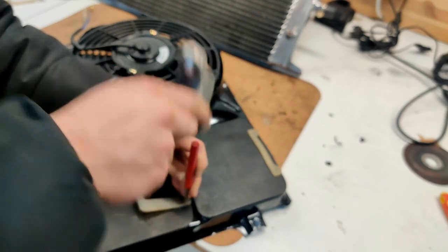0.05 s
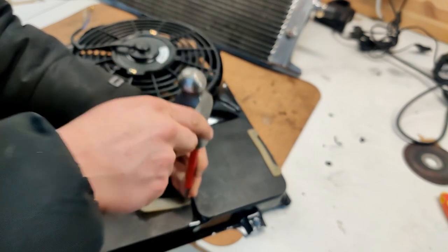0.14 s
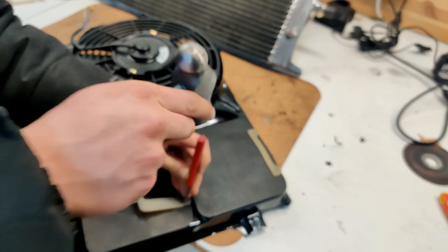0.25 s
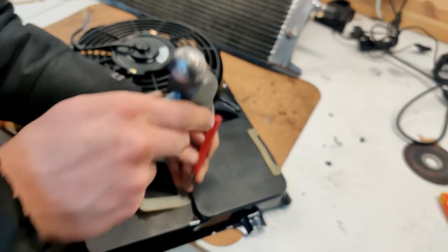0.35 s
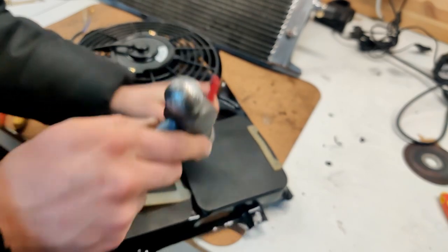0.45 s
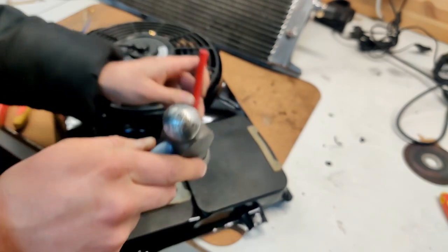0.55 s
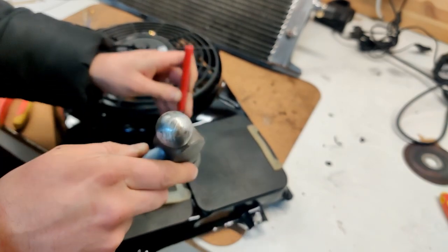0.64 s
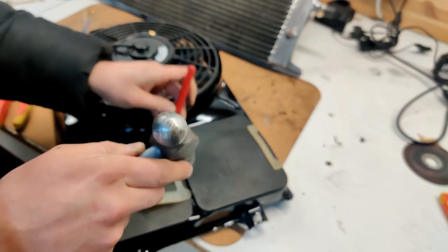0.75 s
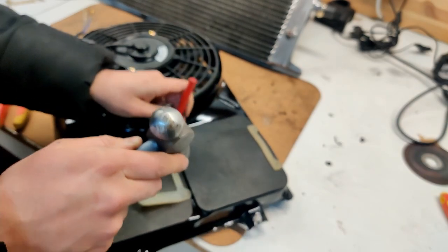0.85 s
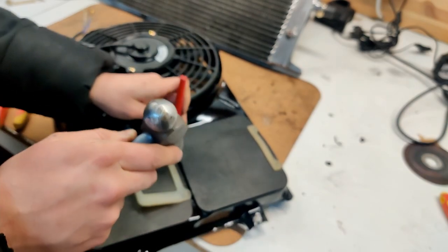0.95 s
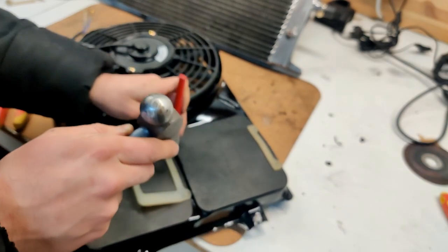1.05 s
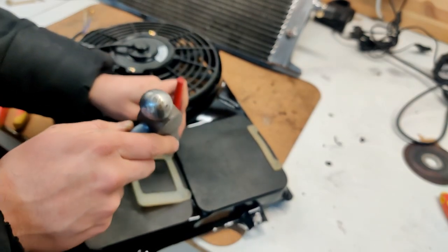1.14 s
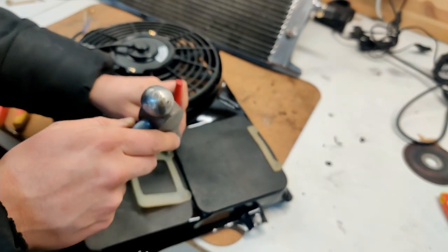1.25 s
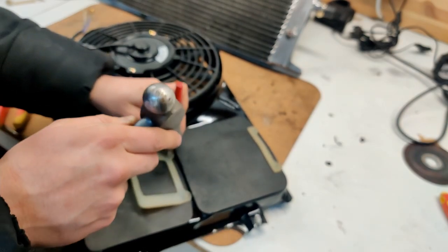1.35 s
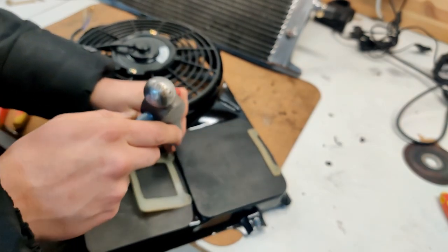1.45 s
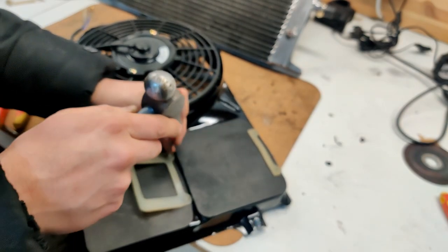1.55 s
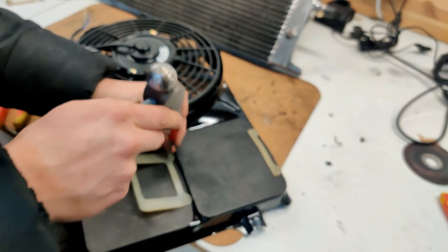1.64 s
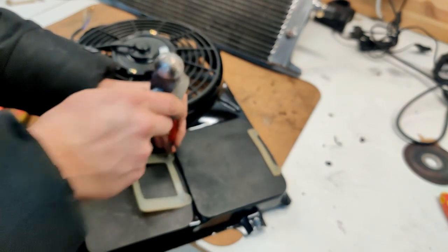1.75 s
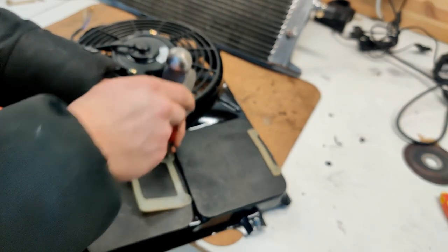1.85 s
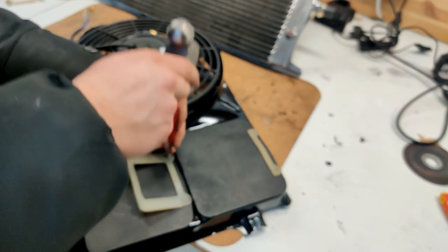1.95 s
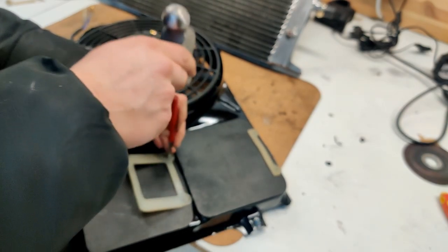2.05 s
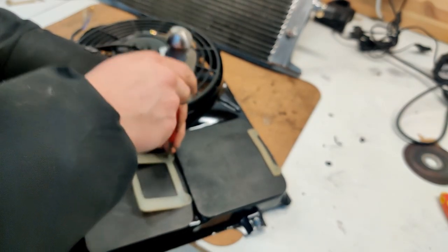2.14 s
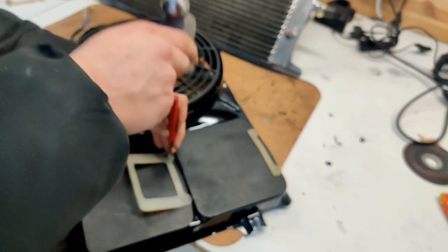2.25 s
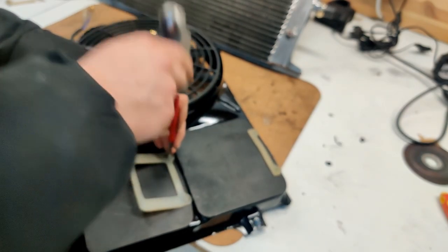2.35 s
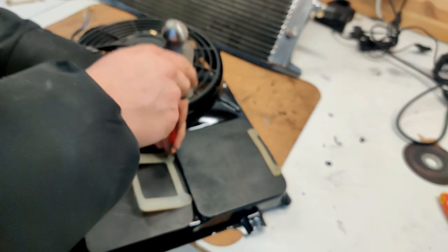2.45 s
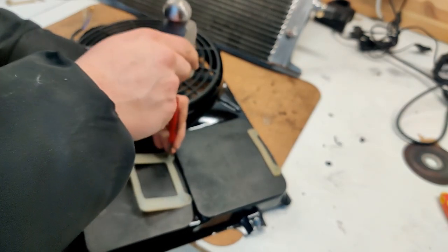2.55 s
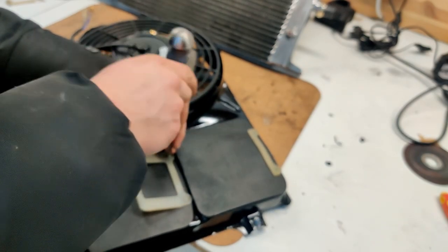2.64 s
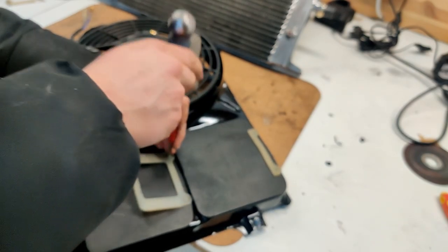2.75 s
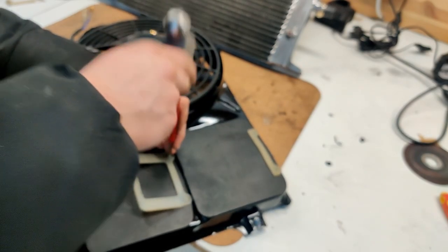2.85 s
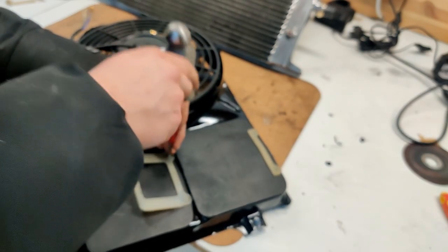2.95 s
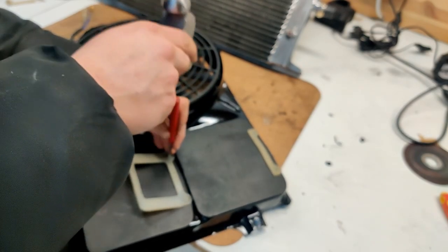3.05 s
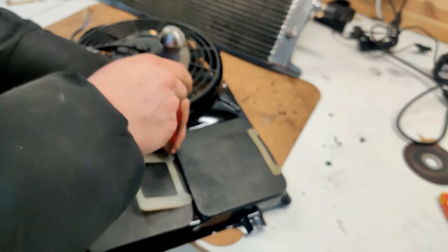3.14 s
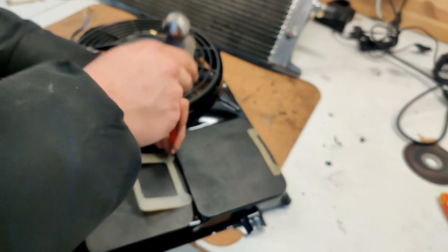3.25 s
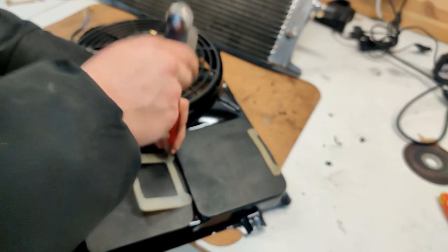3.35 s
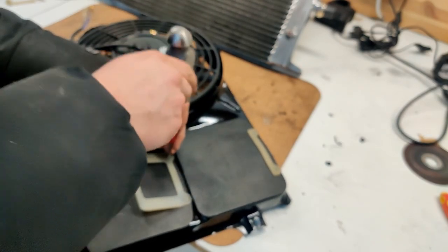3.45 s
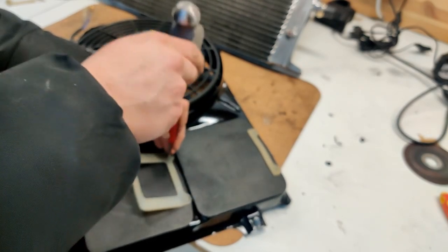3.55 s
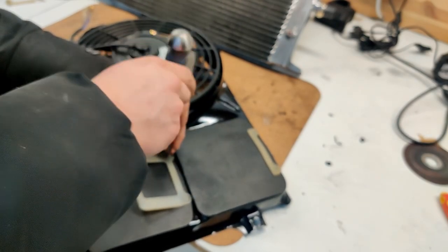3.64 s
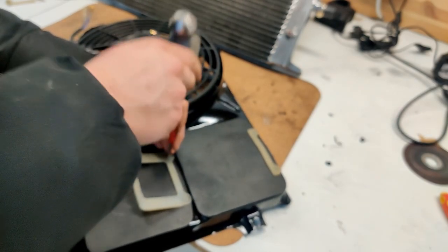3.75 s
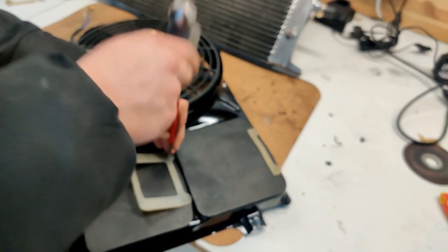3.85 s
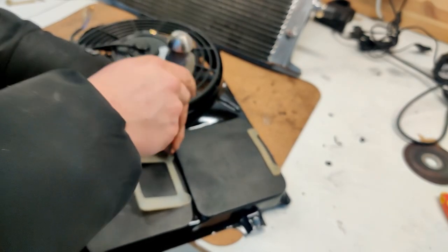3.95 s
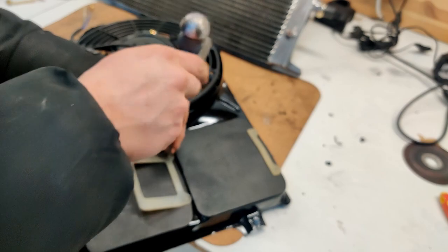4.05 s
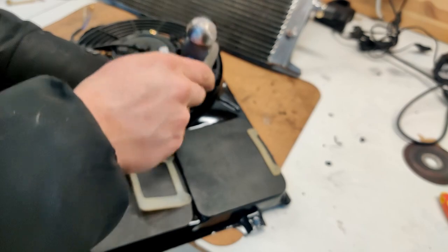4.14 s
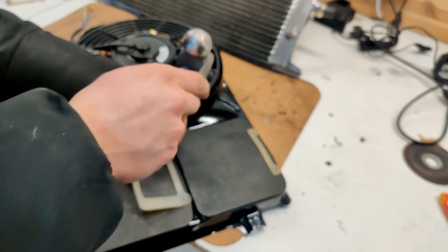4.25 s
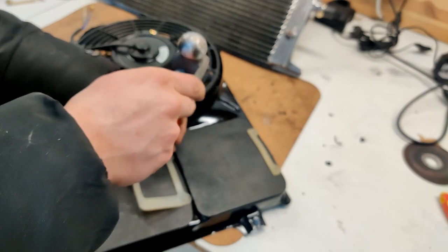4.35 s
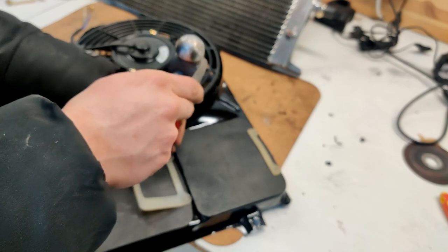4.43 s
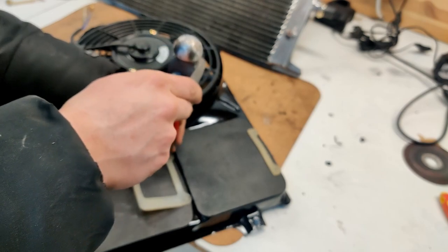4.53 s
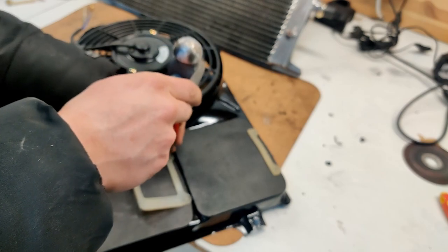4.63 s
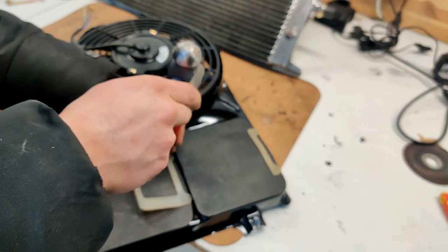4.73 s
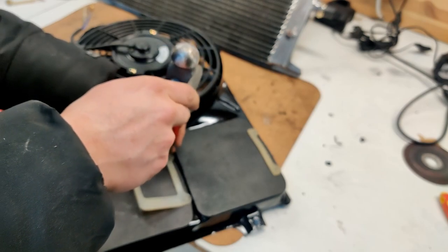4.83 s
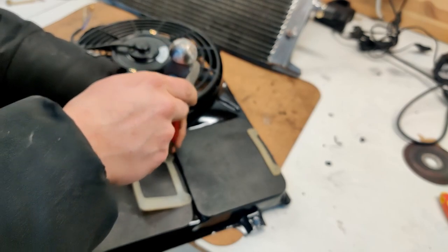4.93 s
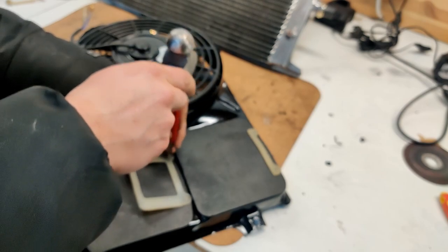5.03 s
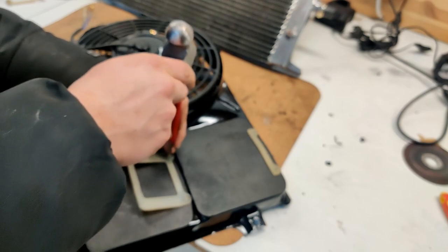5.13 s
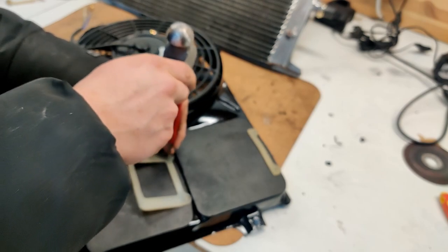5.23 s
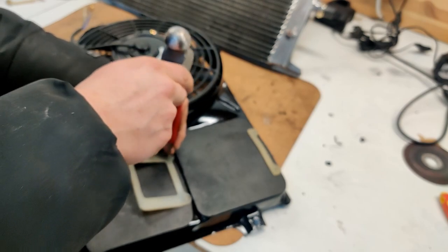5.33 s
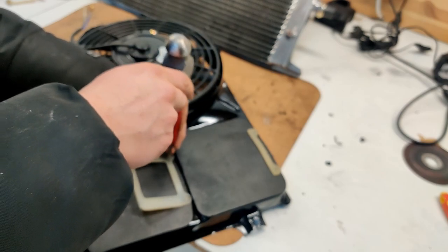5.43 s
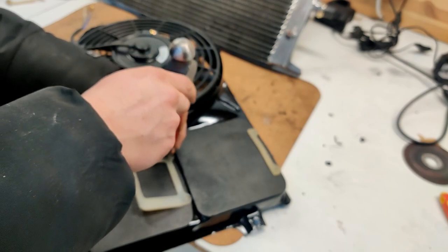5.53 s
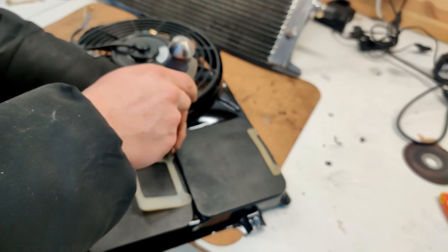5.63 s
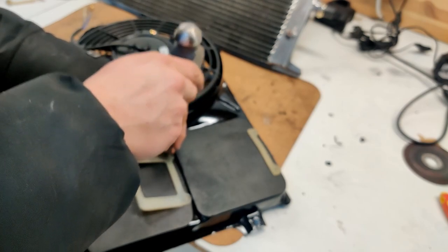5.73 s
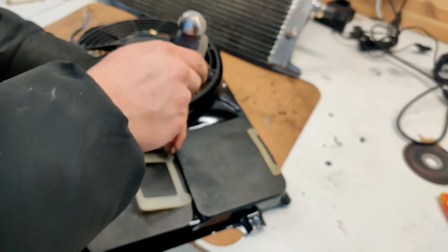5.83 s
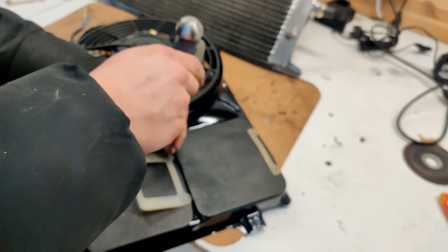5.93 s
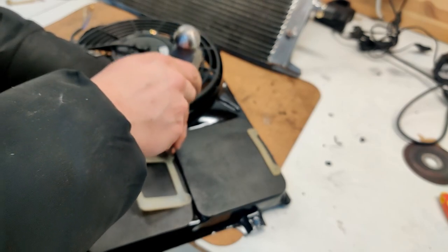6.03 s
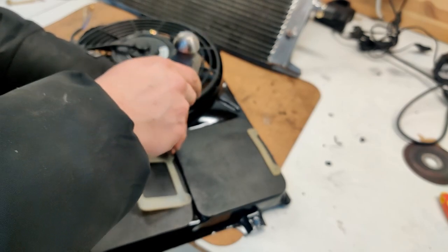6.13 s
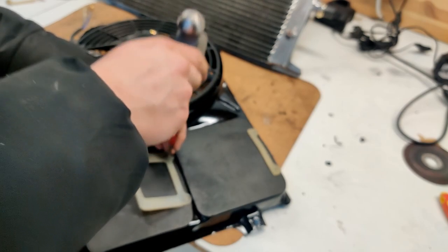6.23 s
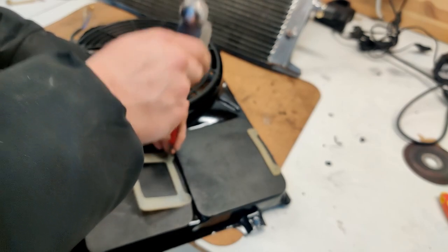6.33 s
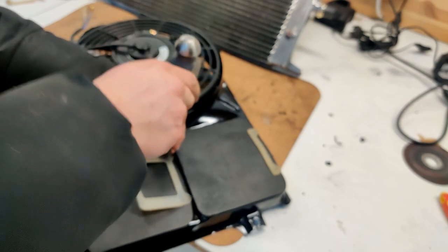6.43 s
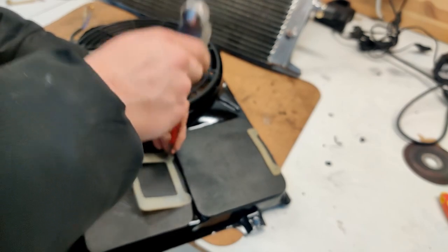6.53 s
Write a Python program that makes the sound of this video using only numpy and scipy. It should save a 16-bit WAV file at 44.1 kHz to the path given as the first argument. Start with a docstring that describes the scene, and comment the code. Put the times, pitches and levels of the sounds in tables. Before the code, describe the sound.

Close microphone at a garage workbench, with very faint air noise. The tail of a previous blow opens, and a hard, bright, short clank lands at 0.15 s. Around 0.5-0.6 s soft hollow knocks mark the part being shifted; tiny touches and faint jacket rustle continue to 1.6 s. A nearly inaudible tap at 1.93 s and a lighter one at 2.2 s lead into firm, even hammer blows from 2.47 to 3.98 s, roughly every quarter second. They have a steel crack, brief housing rattle, thin high ring and low bench boom, becoming thuddier as the pin seats. The rumble fades; a sleeve brushes at 4.2 s, with faint touches at 4.5-4.85 s and a soft double knock at 5.25 s. A dull, weak tap comes at 5.57 s, a moderate one at 6.17 s, and a loud, thudding clank at 6.48 s ends it.

```python
"""Short, damped clanks: a small hammer taps pins through rubber flaps into a metal housing on a garage workbench.
Each tap is a noise crack and chatter plus decaying modes; slow low sines boom as the bench, a noise tail is the garage.
Filtering makes the pins thud more as they go home and dulls the light taps, which the rubber cushions.
Between runs the hands shift the part (soft noise bursts and low modes) and a jacket sleeve rustles (shaped noise).
Bench rumble and faint garage air lie underneath."""
import sys
import numpy as np
from scipy import signal
from scipy.fft import rfft, irfft, next_fast_len
from scipy.io import wavfile
from scipy.ndimage import uniform_filter1d, map_coordinates

SR = 44100
rng = np.random.default_rng(int(sys.argv[2]) if len(sys.argv) > 2 else 0)


def transcribe(u):
    """Save the signal u as a 16-bit wav file named by the first command-line argument.

    u: samples, shape (n,) or (channels, n), limited to [-1, 1]; the rate is SR.
    q: integer samples, one column per channel.
    """
    v = np.clip(np.atleast_2d(u).T, -1, 1)
    q = np.round(v * 32767).astype(np.int16)
    wavfile.write(sys.argv[1], SR, q)


N = 290178

# Hammer taps; mode levels are relative: start_s, level_db, seated_0_to_1,
# low_mode_hz, low_mode_db, high_mode_hz, high_mode_db, pin_ring_hz
TAPS = [(-.125, -3, 0, 2300, -16.5, 3600, -20.5, 10330), (0.153, -2.5, 0.3, 2704, -12, 3800, -15, 10610),
        (1.933, -36, 0.3, 2886, -8.5, 4100, -4, 9800), (2.199, -8.5, 0.06, 2249, -20, 4330, -16.5, 9430),
        (2.466, -2.5, 0.21, 2270, -6, 3604, -16.5, 9900), (2.719, -3, .9, 1965, -13.5, 3518, -15, 11550),
        (2.967, -3, 1, 1966, -13.5, 3539, -20, 11320), (3.228, -3, 0.92, 2233, -12, 3561, -16.5, 10100),
        (3.475, -2.5, 0.87, 1940, -23, 3587, -16, 9950), (3.724, -3, 0.9, 1535, -20.5, 3534, -18, 9900),
        (3.977, -2.5, 0.98, 2198, -14, 3570, -16, 9850), (5.565, -24, 0.35, 1900, -3.5, 4470, -23, 9900),
        (6.166, -11, .5, 1583, -9, 4565, -22, 9500), (6.481, -2, 1, 2282, -10, 3580, -26.5, 11500)]
# Hands and tool touching the part: start_s, level_db, hardness_db_per_octave
TOUCHES = [(0.434, -45, 2), (0.53, -28, -3), (0.564, -31.5, 2.5), (0.591, -44, 5.5), (0.7, -49, -7),
           (0.728, -56, -1), (0.957, -48, 2), (0.997, -56.5, 4.5), (1.211, -52.5, -3), (1.399, -48.5, -2),
           (1.503, -57, 1.5), (1.543, -48.5, -8.5), (1.566, -49.5, 3), (4.545, -46.5, -3.5),
           (4.848, -58.5, 0.5), (5.251, -39, -1.5), (5.277, -40.5, -1.5), (5.954, -56, -1)]
# Sleeve swishes: middle_s, level_db, half_length_s
SWISHES = [(.68, -72, .2), (1.527, -73.5, 0.026), (1.72, -83.5, .14), (1.944, -70.5, 0.1),
           (4.194, -66.5, 0.087), (5.506, -70, .018), (6.411, -63, 0.025)]

# Housing modes, the broad ones choked by rubber and hand: mode_hz, relative_db, t60_s
HOUSING_MODES = [(157.3, -12.5, 0.39), (266.5, -16.5, 0.32), (293.3, -8.5, 0.22), (358, -19, 0.3),
                 (473.4, -11, 0.27), (610.6, -11.5, 0.051), (835.7, -1.5, 0.16), (897, 2, 0.1),
                 (990, -3.5, 0.033), (1077, -3, 0.069), (1239, -1.5, 0.12), (1500, -11.5, 0.069),
                 (1550, -7, 0.16), (1743, -8.5, 0.041), (1950, -7.5, 0.15), (2230, -3, 0.02),
                 (2497, -9, 0.21), (2840, -10.5, 0.021), (2610, -9.5, 0.023), (3257, 0.5, 0.071),
                 (3630, -0.5, 0.034), (3616, -2, .07), (4060, -23, 0.12), (4540, -16, 0.13),
                 (4710, -15.5, .08), (7150, -28, 0.054), (8330, -23, .1), (9226, -20, 0.07)]
# Bench top modes: mode_hz, relative_db, t60_s
BENCH_MODES = [(36.8, -2.5, 0.36), (62.3, -19, 1.1), (80, -15.5, 0.33), (173, -24.5, 0.18)]
# Bench under a soft knock: mode_hz, relative_db, t60_s
HOLLOW_MODES = [(167.1, 0, 0.236), (269.3, -6.5, 0.41), (305, -6.5, 0.15), (382, -3, 0.038)]

# Steel on steel, noise colour: freq_hz, relative_db_per_hz
CRACK_COLOUR = [(100, -18.5), (900, 5.5), (2200, -2.5), (4000, -6.5), (6000, -17), (10000, -10.5),
                (13000, -20.5), (16000, -28.5)]
# Dense, quickly dying housing vibration, noise colour: freq_hz, relative_db_per_hz
CLACK_COLOUR = [(40, -23), (100, -9.5), (220, -6.5), (420, -4), (850, -3), (1350, -4.5), (2400, -4.5),
                (3650, -6), (4100, -10), (4800, -12), (5800, -18), (10000, -21.5), (12500, -33),
                (16000, -46)]
# Soft contact, noise colour: freq_hz, relative_db_per_hz
TOUCH_COLOUR = [(40, 5), (160, 6.5), (400, 6), (900, 2.5), (2000, -11.5), (4300, -15), (5500, -27.5),
                (10000, -37), (16000, -45)]
# Jacket cloth, noise colour: freq_hz, relative_db_per_hz
CLOTH_COLOUR = [(100, 4), (400, 5), (1000, 4), (2000, 1.5), (4300, -3), (5500, -11), (10000, -13),
                (16000, -25)]
# Bench rumble, noise colour: freq_hz, relative_db_per_hz
RUMBLE_COLOUR = [(15, -5), (36, 5.5), (60, -1.5), (100, -19), (170, -22.5), (400, -37.5), (1500, -79.5)]
# Still garage air, noise colour: freq_hz, relative_db_per_hz
AIR_COLOUR = [(15, -35.5), (25, -6.5), (87, -20), (195, -20.5), (229, -23.5), (2840, -35.5), (3520, -33),
              (4030, -35), (11600, -40), (16000, -52)]

# Filter for a tap cushioned by rubber: freq_hz, gain_db
CUSHIONED_GAIN = [(950, 0), (1900, -7), (4600, -9), (6000, -32.5)]
# Filter while the pin stands proud: freq_hz, gain_db
LOOSE_GAIN = [(300, -3.5), (950, -1.5), (1900, -1.5), (4600, 1), (6000, 4)]
# Filter once the pin is home: freq_hz, gain_db
SEATED_GAIN = [(300, 3), (950, 0.5), (1900, 1), (4600, -0.5), (6000, -1)]

# Garage reverberation: freq_hz, t60_s
GARAGE_DECAY = [(60, .5), (160, 0.51), (420, 0.24), (1100, 0.2), (3000, 0.21), (8000, .22), (15000, 0.09)]
# Direct path, then bench, fan and wall: delay_s, gain_db
NEARBY_PATHS = [(0, 2.5), (.005, -4.5), (.008, -9.5), (0.0148, -9)]

ONSET_DELAY_S = 0.0018  # each tap and knock sounds a moment after its start time
BAND_LIMIT_HZ = 16200
PIN_PING_HZ, PIN_PING_DB = 9310, -23.5
PIN_RING_DB, PIN_RING_T60_S = -26.5, 0.15  # thin ring left after the ping
FIRM_DB, LIGHT_DB = -8, -21  # above: steel on steel; below: fully cushioned
BENCH_DB = -11.5  # relative to the tap
TILT_LOW_HZ, TILT_PIVOT_HZ, TILT_HIGH_HZ = 110, 590, 2960  # touch filter is flat outside low..high
SHUDDER_TAP_DB = -30.5  # relative to the tap
SHUDDER_TOUCH_DB, SHUDDER_HZ = -26, 41.8  # relative to the touch's tilted level at this pitch
SHUDDER_RISE_S, SHUDDER_T60_S = 0.02, 1
SWING_DB, SWING_LEAD_S, SWING_HALF_LENGTH_S = -64, 0.012, 0.017  # level relative to the tap
SETTLE_DB, SETTLE_RISE_S, SETTLE_T60_S = -62.5, 0.03, 1.9  # level relative to the tap
REST_RUSTLE_DB, REST_RUMBLE_DB = -90.5, -76.5  # arms leaning still on the bench


def amp(db):
    """Decibels to gain."""
    return 10 ** (np.asarray(db) / 20)


def unit(x):
    """Scale to rms 1."""
    return x / np.sqrt(np.mean(x ** 2) + 1e-20)


def along(points, hz):
    """Interpolate (Hz, value) points on a log frequency axis."""
    point_hz, value = np.transpose(points)
    return np.interp(np.log(hz + 1), np.log(point_hz + 1), value)


def noise(colour, size):
    """Gaussian noise of rms 1, coloured in the spectrum."""
    hz = np.fft.rfftfreq(size, 1 / SR)
    white = rfft(rng.standard_normal(size))
    return unit(irfft(white * amp(along(colour, hz)), size))


def coloured(x, points):
    """Minimum-phase filter with the given (Hz, dB) gain."""
    size = 2 * len(x)
    gain = amp(along(points, np.fft.rfftfreq(size, 1 / SR)))
    cepstrum = irfft(np.log(gain))
    cepstrum[1:size // 2] *= 2  # fold to the causal half
    cepstrum[size // 2 + 1:] = 0
    response = np.exp(rfft(cepstrum))
    return irfft(rfft(x, size) * response)[:len(x)]


def wobble(knots_per_s):
    """Smooth random curve: a spline through Gaussian knots."""
    knots = rng.standard_normal(int(N * knots_per_s / SR) + 4)
    return map_coordinates(knots, [np.arange(N) * knots_per_s / SR])


def add(track, start_s, sound):
    """Mix a sound into the track; what falls outside is dropped."""
    start = round(start_s * SR)
    part = sound[max(-start, 0):max(N - start, 0)]
    track[max(start, 0):][:len(part)] += part


def burst(t, attack_s, length_s, shape):
    """Quick rise and a fall; a higher shape holds longer, then drops faster."""
    return (1 - np.exp(-t / attack_s)) * np.exp(-(t / length_s) ** shape)


def swell(t, middle_s, half_length_s):
    """Smooth rise and fall around a moment."""
    return np.exp(-((t - middle_s) / half_length_s) ** 2)


def dying(t, rise_s, t60_s):
    """Zero before t = 0, then a rise and a steady decay."""
    age = np.maximum(t, 0)
    return (1 - np.exp(-age / rise_s)) * amp(-60 * age / t60_s)


def ring(modes, t, scatter_db, attack_s, blur_hz):
    """Decaying modes of scattered strength; loose contacts blur the pitch as a random phase walk."""
    hz, db, t60_s = np.transpose(modes)[:, :, None]
    strength = amp(db + scatter_db * rng.standard_normal(hz.shape) - 60 * t / t60_s)
    step = np.sqrt(2 * np.pi * blur_hz / SR)
    drift = np.cumsum(rng.standard_normal(strength.shape), axis=1) * step
    drift = uniform_filter1d(drift, size=200, axis=1)
    sign = (-1) ** np.arange(len(modes))[:, None]  # neighbouring modes swing oppositely
    total = np.sum(sign * strength * np.sin(2 * np.pi * hz * t + drift), axis=0)
    return total * (1 - np.exp(-t / attack_s))


def echoed(x):
    """Direct sound and its first bounces off nearby things, as delayed copies."""
    paths = []
    for delay_s, db in NEARBY_PATHS:
        delayed = np.pad(x, (round(delay_s * SR), 0))[:len(x)]
        paths.append(amp(db) * delayed)
    return sum(paths)


def in_garage(x, wet_db, build_s):
    """Add a diffuse tail: noise that builds up, then decays at a rate set by frequency."""
    hz, t, bins = signal.stft(rng.standard_normal(len(x)), SR, nperseg=256)
    decay = amp(-60 * t / along(GARAGE_DECAY, hz)[:, None])
    tail = signal.istft(bins * decay, SR, nperseg=256)[1]
    tail = tail * (1 - np.exp(-np.arange(len(tail)) / SR / build_s))
    tail = tail / np.linalg.norm(tail)
    return x + amp(wet_db) * signal.fftconvolve(x, tail)[:len(x)]


def tilt(hardness_db_per_octave, hz):
    """Gain in dB about the pivot: hard contacts are bright, soft ones boomy."""
    return hardness_db_per_octave * np.log2(hz / TILT_PIVOT_HZ)


def tap_colour(level_db, seated):
    """(Hz, dB) filter: a seated pin thuds more and clinks less; rubber dulls a light tap."""
    hz = np.transpose(SEATED_GAIN)[0]
    cushioned = np.clip((FIRM_DB - level_db) / (FIRM_DB - LIGHT_DB), 0, 1)
    depth = np.clip(seated, 0, 1)
    gain_db = (1 - depth) * along(LOOSE_GAIN, hz) + depth * along(SEATED_GAIN, hz)
    gain_db = gain_db + cushioned * along(CUSHIONED_GAIN, hz)
    return [*zip(hz, gain_db)]


def garage_air():
    """Still air: faint steady noise."""
    return amp(-79.5) * noise(AIR_COLOUR, N)


def shudder():
    """Taps and soft knocks leave the bench rumbling: low noise, decaying powers summed."""
    t = np.arange(N) / SR
    jolts = [(s, db + SHUDDER_TAP_DB) for s, db, *_ in TAPS]
    for s, db, hardness in TOUCHES:
        jolts.append((s, db + tilt(hardness, SHUDDER_HZ) + SHUDDER_TOUCH_DB))
    power = sum((amp(db) * dying(t - s, SHUDDER_RISE_S, SHUDDER_T60_S)) ** 2 for s, db in jolts)
    return np.sqrt(power + amp(REST_RUMBLE_DB) ** 2) * noise(RUMBLE_COLOUR, N)


def sleeve():
    """Cloth noise swells as the arm moves and on each downswing, then settles after the blow."""
    t = np.arange(N) / SR
    swishes = sum(amp(db) * swell(t, middle_s, half_s) for middle_s, db, half_s in SWISHES)
    swings, settling_power = 0, 0
    for s, db, *_ in TAPS:
        swings += amp(db + SWING_DB) * swell(t, s - SWING_LEAD_S, SWING_HALF_LENGTH_S)
        settling_power += (amp(db + SETTLE_DB) * dying(t - s, SETTLE_RISE_S, SETTLE_T60_S)) ** 2
    level = np.sqrt((swishes + swings) ** 2 + settling_power + amp(REST_RUSTLE_DB) ** 2)
    flutter = amp(1.7 * wobble(knots_per_s=28))
    return level * flutter * noise(CLOTH_COLOUR, N)


def hands():
    """Soft knocks and scuffs of part and tool: noise bursts, low housing modes, hollow bench modes."""
    track, t = np.zeros(N), np.arange(SR // 2) / SR
    low_modes = [mode for mode in HOUSING_MODES if mode[0] < 2000]  # all a soft touch wakes
    for s, db, hardness in TOUCHES:
        contact = burst(t, attack_s=0.0005, length_s=0.017, shape=1.17)
        contact += burst(t, attack_s=0.00017, length_s=0.0015, shape=2)
        scuff = contact * noise(TOUCH_COLOUR, len(t))
        hollow = amp(-4) * ring(HOLLOW_MODES, t, scatter_db=1, attack_s=0.0026, blur_hz=3.4)
        body = amp(-18.5) * ring(low_modes, t, scatter_db=8, attack_s=0.00094, blur_hz=7.5)
        heard = in_garage(scuff + body, wet_db=-8, build_s=0.0017) + hollow
        colour = [(hz, tilt(hardness, hz)) for hz in (TILT_LOW_HZ, TILT_HIGH_HZ)]
        add(track, s + ONSET_DELAY_S, amp(db - 12) * coloured(heard, colour))
    return track


def bench():
    """Blows sink through the housing into the bench top, whose modes swing up slowly and boom."""
    track, t = np.zeros(N), np.arange(SR) / SR
    sway = sum(amp(db - 60 * t / t60_s) * np.sin(2 * np.pi * hz * t) for hz, db, t60_s in BENCH_MODES)
    boom = sway * (1 - np.exp(-(t / 0.063) ** 2))
    for s, db, *_ in TAPS:
        add(track, s, amp(db + BENCH_DB) * boom)
    return track


def hammer():
    """Taps crack, chatter through the housing and ring its modes; struck spot and pin face the microphone."""
    track, t = np.zeros(N), np.arange(SR // 2) / SR
    for s, db, seated, low_hz, low_db, high_hz, high_db, pin_hz in TAPS:
        crack = amp(1) * burst(t, attack_s=0.001, length_s=0.0022, shape=2) * noise(CRACK_COLOUR, len(t))
        # wall flexes once under the head
        dent = amp(-2) * np.sin(2 * np.pi * 880 * t) * swell(t, middle_s=0.0016, half_length_s=0.00046)
        # whole part gives way
        push = amp(-5) * np.sin(2 * np.pi * 105 * t) * np.exp(-t / 0.0036)
        clack_level = amp(-0.5) * burst(t, attack_s=0.0023, length_s=0.016, shape=1.4)
        clack = clack_level * noise(CLACK_COLOUR, len(t))
        modes = amp(-7.5) * ring(HOUSING_MODES, t, scatter_db=1, attack_s=0.0006, blur_hz=12)
        sides = in_garage(echoed(crack + dent) + push + clack, wet_db=-13.5, build_s=0.012)
        sides += in_garage(modes, wet_db=-20.5, build_s=0.02)

        spot_modes = [(low_hz, low_db, 0.04), (high_hz, high_db, 0.055)]
        ping_mode = [(PIN_PING_HZ, PIN_PING_DB, 0.012)]
        pin_mode = [(pin_hz, PIN_RING_DB, PIN_RING_T60_S)]
        spot = amp(14.5) * ring(spot_modes, t, scatter_db=0.5, attack_s=0.002, blur_hz=45)
        ping = amp(28.5) * ring(ping_mode, t, scatter_db=0.5, attack_s=0.002, blur_hz=200)
        singing = ring(pin_mode, t, scatter_db=0.5, attack_s=0.002, blur_hz=130)
        near = in_garage(spot + ping + singing, wet_db=-17.5, build_s=0.01)

        tap = coloured(sides + near, tap_colour(db, seated))
        add(track, s + ONSET_DELAY_S, amp(db - 9.5) * tap)
    return track


def scene():
    """Sum all sources at one microphone."""
    return (garage_air() + shudder() + sleeve() + hands() + bench() + hammer())[None]


def record(dry):
    """Recorder: soft-limit the highest peaks, then cut steeply above the band limit."""
    ceiling = 0.9
    rounded = dry / (1 + np.abs(dry / ceiling) ** 6) ** (1 / 6)
    size = next_fast_len(N + SR // 2)
    passed = 1 / (1 + (np.fft.rfftfreq(size, 1 / SR) / BAND_LIMIT_HZ) ** 160)
    return irfft(rfft(rounded, size) * passed, size)[:, :N]


dry = scene()
out = record(dry)
transcribe(out)
```